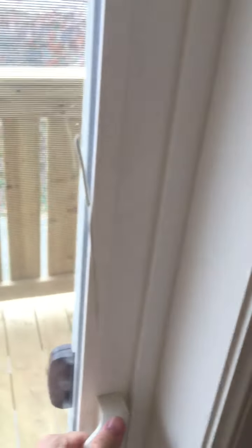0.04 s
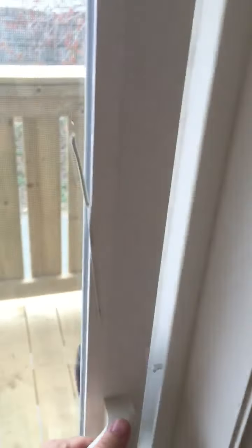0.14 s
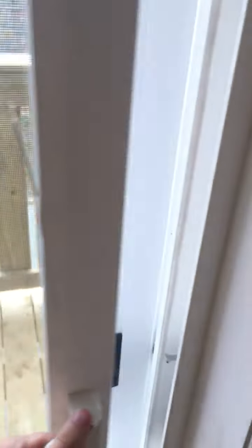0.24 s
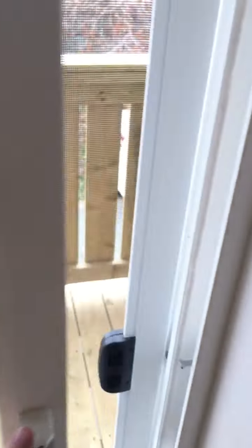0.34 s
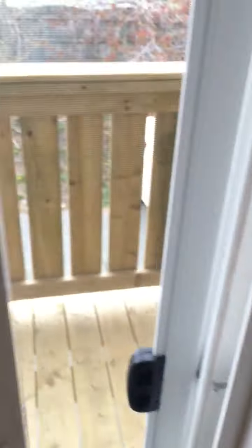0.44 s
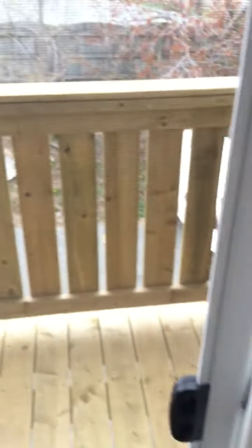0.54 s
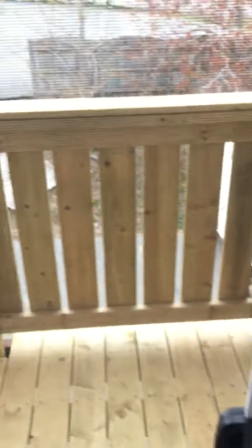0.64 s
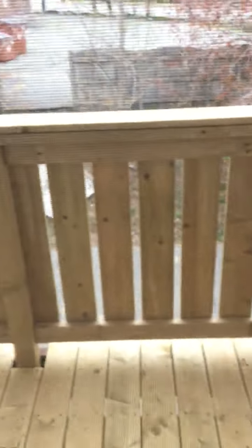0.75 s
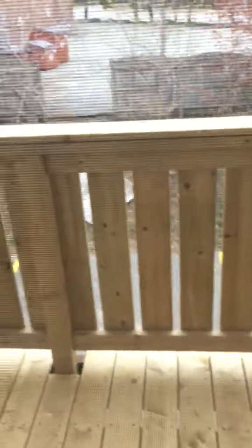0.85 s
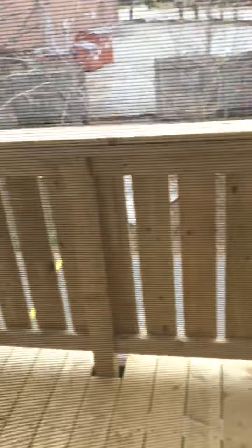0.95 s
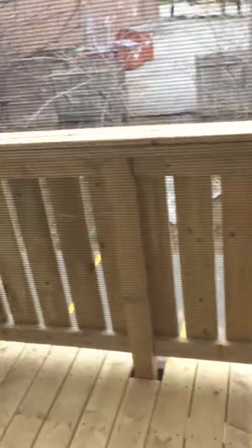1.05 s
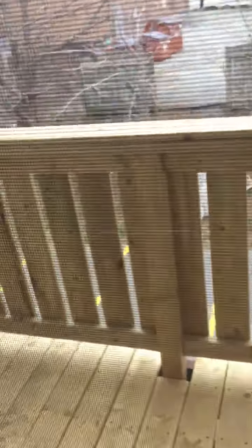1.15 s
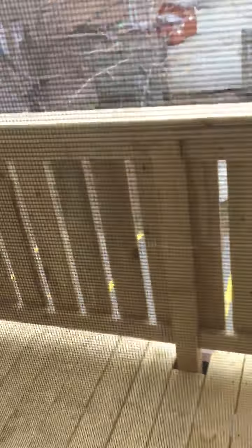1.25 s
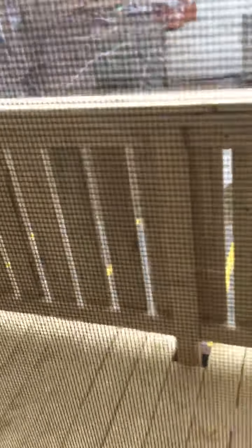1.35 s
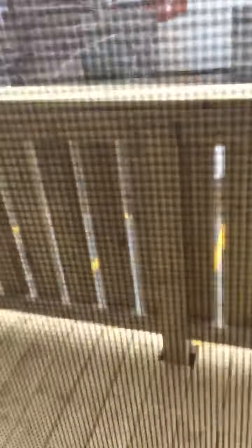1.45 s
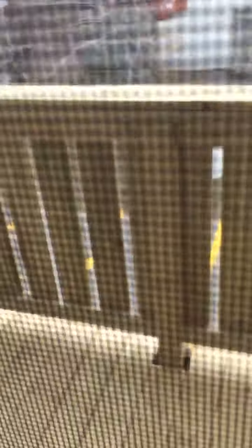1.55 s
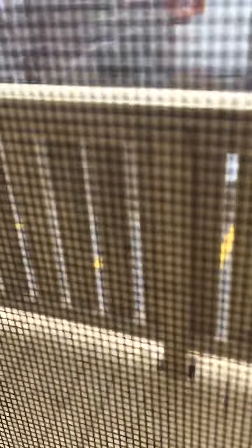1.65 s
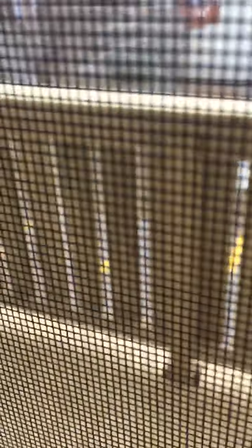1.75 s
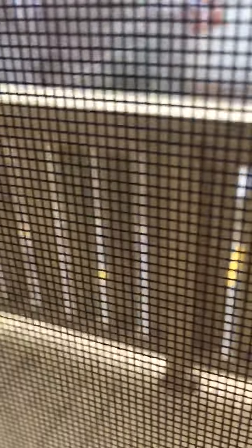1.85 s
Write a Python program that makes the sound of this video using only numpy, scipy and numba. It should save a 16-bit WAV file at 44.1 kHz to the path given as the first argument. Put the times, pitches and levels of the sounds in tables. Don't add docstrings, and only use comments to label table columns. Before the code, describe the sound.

A stuck sliding glass door clacks loose, hisses along its track and thuds against its stop.

```python
import sys
import numpy as np
from scipy import signal
from scipy.fft import rfft, irfft
from scipy.io import wavfile
from scipy.ndimage import uniform_filter1d
from numba import njit

SR = 44100
rng = np.random.default_rng(int(sys.argv[2]) if len(sys.argv) > 2 else 0)


def rack_gain(trim_db):
    fader = np.asarray(trim_db, float)
    return 10 ** (fader / 20)


def transcribe(u):
    v = np.clip(np.atleast_2d(u).T, -1, 1)
    q = np.round(v * 32767).astype(np.int16)
    wavfile.write(sys.argv[1], SR, q)


N = 81585


def column(table, index, t):
    table = np.array(table)
    return np.interp(t, table[:, 0], table[:, index])


def unit(x):
    return x / np.sqrt(np.mean(x ** 2))


@njit
def state_variable(x, hz, width):
    y, band, low = np.empty(len(x)), 0., 0.
    g, damping = np.tan(np.pi * hz / SR), width / hz
    for i in range(len(x)):
        v = (band + g * (x[i] - low)) / (1 + g * (g + damping))
        band, low = 2 * v - band, low + 2 * g * v
        y[i] = damping * v
    return y


def band_pass(x, hz, width):
    return state_variable(x, float(hz), float(width))


def band_noise(hz, width):
    return band_pass(rng.standard_normal(N), hz, width)


def walk(rate):
    hold = int(SR / rate)
    steps = np.repeat(rng.standard_normal(N // hold + 1), hold)
    return 0.56 * uniform_filter1d(uniform_filter1d(steps, hold), hold)[:N]


def coloured(spectrum, flicker_db, grain_db=0):
    hz = np.maximum(np.arange(N // 2 + 1) * SR / N, 1)
    corner_hz, corner_db = np.transpose(spectrum)
    gain = rack_gain(np.interp(np.log(hz), np.log(corner_hz), corner_db, left=-90))
    out = 0
    for octave in range(5, 15):
        band = np.cos(np.pi / 2 * np.clip(np.log2(hz) - octave, -1, 1))
        noise = rng.standard_normal(N) * rack_gain(grain_db * rng.exponential(size=N))
        out = out + irfft(rfft(unit(noise)) * gain * band, N) * rack_gain(flicker_db * walk(14))
    return unit(out)


def ring(push, modes):
    out = 0
    for hz, db, t60 in modes:
        pole = np.exp(2j * np.pi * hz / SR - np.log(1000) / (t60 * SR))
        out = rack_gain(db) * signal.lfilter([1], [1, -pole], push).imag - out
    return out


def knocks(hits, modes, crack, t):
    crack_db, crack_decay_s, crack_hz = crack
    own_t60_s = 0.0076
    out = 0
    for at, db, ms, own_hz, own_db in hits:
        push = np.exp(-2 * ((t - at) / (ms / 1000)) ** 2)
        luck = rng.standard_normal(len(modes))
        struck = [(hz * (1 + 0.054 * r), d + 1.2 * r, t60) for (hz, d, t60), r in zip(modes, luck)]
        body = ring(push / push.sum(), struck + [(own_hz, own_db, own_t60_s)])
        fade = (t > at) * np.exp(-np.abs(t - at) / crack_decay_s)
        noise = band_noise(crack_hz, 1.22 * crack_hz) * fade
        sharpness = np.clip(.09 / ms, 0, 1) ** 2
        out = out + rack_gain(db) * (body + rack_gain(crack_db) * noise * sharpness)
    return out


def swells(table, rough_db, t):
    out = 0
    for at, db, hz, length, rise in table:
        late = t - at
        tone = np.sin(2 * np.pi * (hz + rise * late / 2) * late)
        out = out + rack_gain(db) * tone * np.exp(-(late / length) ** 2)
    return out * rack_gain(rough_db * walk(120))


# [f/Hz, level/dB]
HUM_TONES = [(56, -65), (231, -69.5)]


def hum(t):
    return sum(rack_gain(db + 0.75 * walk(9.5)) * np.sin(2 * np.pi * hz * t) for hz, db in HUM_TONES)


# [f/Hz, density/dB per Hz]
INDOOR_COLOUR = [(25, -19), (60, -8), (170, -1.5), (400, -10.5), (1200, -6.5), (2500, -22), (8000, -29),
                 (16000, -34)]


def room_tone():
    return coloured(INDOOR_COLOUR, 1.0) * rack_gain(-65)


# [f/Hz, density/dB per Hz]
TRAFFIC_COLOUR = [(18, -30), (30, -4), (64, 5), (174, -0.5), (345, -5), (1130, -8.5), (1670, -23.5),
                  (9460, -41), (16000, -72)]
# [t/s, level/dB]
OPENING = [
    (0, -65),
    (.12, -92),
    (.22, -39.5),
    (.6, -45.5),
    (1.0, -49.5),
    (1.3, -40.5),
    (1.6, -41),
    (1.85, -45),
]


def traffic(t):
    return coloured(TRAFFIC_COLOUR, 0.33) * rack_gain(column(OPENING, 1, t))


# [f/Hz, t60/s, level/dB]
ROOM_BANDS = [(130, 0.66, -4.5), (251, 0.75, -7.5), (540, 0.9, -7.5), (880, 2.23, -10), (1200, 1.02, -10.5),
              (2270, 0.25, -5), (4500, 1.2, -9)]
# [f/Hz, level/dB]
FRAME_TONES = [(755, -10), (888, -17), (1040, -12), (1150, -18.5), (1260, -18.5)]


def room(latch_sound, t):
    blow_s, blow_ms, build_s = 1.305, 0.087, 0.0029
    frame_width_hz, frame_t60_s = 26, 1.34
    echo = 0
    for hz, t60, db in ROOM_BANDS:
        echo = echo + rack_gain(db - 60 * t / t60) * unit(band_noise(hz, 0.97 * hz))
    for hz, db in FRAME_TONES:
        echo = echo + rack_gain(db - 60 * t / frame_t60_s) * unit(band_noise(hz, frame_width_hz))
    echo = echo * (1 - np.exp(-t / build_s)) / np.sqrt(SR / 10)
    blow = np.exp(-((t - blow_s) / (blow_ms / 1000)) ** 2)
    return signal.fftconvolve(rack_gain(-3) * blow + rack_gain(-14) * latch_sound, echo)[:N]


# [t/s, level/dB, f/Hz, t60/s]
LURCHES = [(0.234, -34, 64.3, 0.43), (0.233, -21, 400, 0.12), (0.282, -27, 79, 0.13),
           (0.296, -25.5, 245, 0.13), (0.358, -27, 89, 0.048), (0.43, -39, 53, 0.3), (1.318, -26, 60, 0.24),
           (1.316, -27, 158, 0.095), (1.374, -25.5, 247, 0.22), (1.41, -26.5, 91.5, 0.23),
           (1.469, -29, 77.6, 0.17), (1.582, -37, 67, 0.21)]


def thumps(t):
    push_s = .0008
    out = 0
    for at, db, hz, t60 in LURCHES:
        push = np.exp(-((t - at) / push_s) ** 2) / (push_s * SR * np.sqrt(np.pi))
        out = out + rack_gain(db) * ring(push, [(hz, 0, t60)])
    return out


# [f/Hz, width/Hz, level/dB]
ROLLER_MODES = [(203, 96, 2.5), (254, 62, 0), (355.5, 41, 3), (910, 190, -9)]
# [t/s, level/dB]
ROLLER_LOAD = [
    (.17, -105),
    (.23, -38.5),
    (.3, -47.5),
    (.42, -44),
    (.7, -41.5),
    (.9, -37),
    (1.05, -40),
    (1.15, -42),
    (1.3, -53),
]


def rollers(t):
    bumps_per_s, spread_db, stop_db_per_s = 500, 2.5, -27
    bumps = (rng.random(N) < bumps_per_s / SR) * rng.standard_normal(N) * rack_gain(spread_db * walk(25.8))
    frame = 0
    for hz, width, db in ROLLER_MODES:
        frame = frame + rack_gain(db) * band_pass(band_pass(bumps, hz, 1.6 * width), hz, 1.36 * width)
    after_stop = np.maximum(t - ROLLER_LOAD[-1][0], 0)
    return unit(frame) * rack_gain(column(ROLLER_LOAD, 1, t) + stop_db_per_s * after_stop)


# [t/s, level/dB, f/Hz, length/s, rise/Hz per s]
ROUGH_STRETCHES = [(.5, -40.5, 216, .03, 0), (.6, -41, 218, .03, 0), (.72, -47, 150, 0.025, 0),
                   (.79, -39, 372, .03, 0), (.8, -42.5, 593, 0.014, 0), (.84, -35, 192, .018, 0),
                   (.89, -32, 381, 0.017, 298), (.9, -42, 218, 0.025, 302), (.955, -44, 264, 0.017, 0),
                   (1.015, -37, 222, 0.031, 0), (1.02, -38, 327, .025, 0), (1.06, -41.5, 263, 0.021, 500),
                   (1.065, -43, 382, 0.014, 0)]


def grinds(t):
    return swells(ROUGH_STRETCHES, 1.1, t)


# [f/Hz, level/dB, t60/s]
HOOK_MODES = [(4340, -12, 0.033), (5510, -7.5, 0.063), (6550, -10.5, 0.039), (9776, -6, .05),
              (11690, -4.5, 0.1), (12100, -9, .03), (12660, -14, .04), (14800, -11, 0.065)]


def ping(t):
    snap_s, again_s, rattle_s = .2812, .00473, .002
    touches = np.zeros(N)
    touches[int(snap_s * SR)] = .7
    touches[int((snap_s + again_s) * SR)] = 1.07
    tick = band_noise(6200, 11000) * (t > snap_s) * np.exp(-np.abs(t - snap_s) / rattle_s)
    return rack_gain(-27) * (ring(touches, HOOK_MODES) + 2.5 * tick)


# [t/s, level/dB, contact/ms, own f/Hz, own level/dB]
LATCH_HITS = [(.2070, -18, 0.13, 890, -11), (.2160, -25, 0.16, 1000, -21), (.2250, -18.5, 0.26, 1400, 7.5),
              (.2335, -8.5, 0.62, 430, -9.5), (.2353, -21, 0.06, 4500, -3.5),
              (.2523, -8.5, 0.041, 1600, -6), (.2545, -20, .06, 2450, -4), (.2590, -15.5, 0.092, 1300, 5),
              (.2598, -14, 0.075, 3400, 3), (.2625, -23.5, .08, 2600, 0), (.2660, -20.5, 0.13, 2200, 0.5),
              (.2815, -21, 0.023, 11460, 1), (.2960, -17.5, 0.19, 1330, -0.5)]
# [f/Hz, level/dB, t60/s]
LATCH_MODES = [(400, -13, 0.0063), (807, -16.5, 0.053), (1030, -11.5, 0.0077), (1314, -8, 0.028),
               (1760, -5.5, 0.0055), (2270, -9, 0.014), (2900, -5, 0.0025), (4800, -3.5, 0.0022),
               (6540, -7, 0.0048), (11500, -6.5, 0.0072)]
# [level/dB, decay/s, f/Hz]
LATCH_CLICK = (-5, .0011, 4000)


def latch(t):
    return knocks(LATCH_HITS, LATCH_MODES, LATCH_CLICK, t) + ping(t)


def crunch(t):
    at, decay_s = 1.303, 0.014
    grains = rng.standard_normal(N) * rack_gain(4.5 * rng.exponential(size=N))
    fade = (t > at) * np.exp(-np.abs(t - at) / decay_s)
    return rack_gain(-27) * unit(band_pass(grains, 3200, 6000)) * fade


# [t/s, level/dB, contact/ms, own f/Hz, own level/dB]
STOP_HITS = [(1.2978, -11.5, 0.13, 1500, 2.5), (1.3010, -13, 0.14, 3700, -11),
             (1.3027, -13, 0.15, 1500, 4.5), (1.3043, -13.5, 0.054, 1980, 2.5),
             (1.3062, -11.5, 0.099, 1200, 6), (1.3080, -17, 0.14, 2660, 8), (1.3110, -11.5, 0.13, 965, 3),
             (1.3140, -10.5, 0.32, 290, 5.5), (1.3165, -19.5, 0.12, 2900, 0.5),
             (1.3187, -13.5, 0.23, 1000, 3.5), (1.3222, -21, 0.08, 2860, 1.5), (1.3300, -20, 0.34, 790, 0),
             (1.3365, -25, 0.44, 353, -2), (1.3440, -16, 0.29, 1200, 2)]
# [f/Hz, level/dB, t60/s]
PANE_MODES = [(166, -21, 0.038), (262, -25, 0.031), (333.3, -16.5, 0.042), (466, -20, 0.012),
              (653, -18, 0.023), (805, -9.5, 0.026), (858, -13, 0.056), (1140, -2, 0.018),
              (1215, -1.5, 0.027), (1830, 0, 0.0084), (2130, -1.5, 0.012), (2620, -7, 0.016),
              (3400, -2, 0.0047), (5330, 0, 0.0065)]
# [level/dB, decay/s, f/Hz]
STOP_SNAP = (-3, .003, 2400)


def stop(t):
    return knocks(STOP_HITS, PANE_MODES, STOP_SNAP, t) + crunch(t)


# [t/s, level/dB, f/Hz, length/s, rise/Hz per s]
BRISTLE_SQUEAKS = [
    (.77, -56, 4300, 0.025, -2),
    (.815, -60, 5780, .025, 496),
    (.89, -48, 5380, .04, 1500),
    (1.04, -46, 5600, 0.034, 6000),
    (1.072, -46, 6530, .015, 0),
    (1.07, -47, 4250, 0.018, 0),
    (1.34, -55, 9800, .02, 0),
    (1.48, -53, 5700, 0.081, 600),
]


def squeaks(t):
    return swells(BRISTLE_SQUEAKS, 3.0, t)


# [t/s, rubbing level/dB, brightness/dB]
SEAL_MOTION = [(0, -101, 3), (.1, -96, -12), (.16, -57, -4), (.2, -46.5, -2.5), (.24, -48, -11),
               (.32, -41, -2.5), (.42, -40.5, 0.5), (.75, -40, -0.5), (.96, -40.5, -1.5), (1.1, -41.5, 1.5),
               (1.28, -43, 2.5), (1.45, -46.5, -2), (1.6, -46.5, 2), (1.67, -51, -1), (1.74, -62.5, -6),
               (1.79, -54, -2.5), (1.85, -53.5, 0)]
# [f/Hz, density/dB per Hz]
SEAL_COLOUR = [(260, -3), (450, -5.5), (756, -3), (945, -2), (2010, -6), (4760, -12), (5520, -14),
               (12300, -23), (15600, -27)]
# [f/Hz, width/Hz, depth/0-1]
FRAME_NOTCHES = [(490, 260, 0.44), (4850, 930, 0.37), (7780, 950, 0.32), (10430, 1030, 0.54)]
# [f/Hz, width/Hz, share]
BRISTLE_PEAKS = [(5600, 850, 0.43), (9770, 2000, 0.43), (6500, 430, 0.15)]
# [t/s, length/s, f/Hz, width/Hz, share]
BRISTLE_DRAGS = [(0.58, .1, 13000, 5000, .3), (0.763, 0.072, 2000, 900, 0.42), (.8, .12, 13000, 6700, 0.47),
                 (0.94, 0.059, 5350, 400, 0.68), (1.02, 0.036, 11000, 8000, 0.53),
                 (1.27, 0.15, 13000, 5700, -0.4), (0.71, 0.19, 3900, 1400, -0.36),
                 (1.38, 0.074, 7200, 4000, 0.63), (1.62, 0.079, 4200, 900, 0.75),
                 (1.5, 0.093, 14000, 4500, -0.5), (1.81, .05, 9500, 1500, 0.47),
                 (0.66, 0.045, 1100, 330, 0.14)]


def seal(t):
    hiss = coloured(SEAL_COLOUR, flicker_db=.6, grain_db=2.5)
    for hz, width, depth in FRAME_NOTCHES:
        hiss = hiss - depth * band_pass(hiss, hz, width)
    hiss = hiss + sum(share * band_pass(hiss, hz, width) for hz, width, share in BRISTLE_PEAKS)
    drags = 0
    for at, length, hz, width, share in BRISTLE_DRAGS:
        drags = drags + share * np.exp(-((t - at) / length) ** 2) * band_pass(hiss, hz, width)
    hiss = hiss + drags
    low = signal.lfilter([.3], [1, -.7], hiss)
    high = signal.lfilter([.5, -.5], [1], hiss)
    tilt_db = column(SEAL_MOTION, 2, t)
    tilted = rack_gain(-tilt_db) * low + hiss - low + (rack_gain(2 * tilt_db) - 1) * high
    return tilted * rack_gain(5.5 + column(SEAL_MOTION, 1, t))


def scene():
    t = np.arange(N) / SR
    latch_sound = latch(t)
    background = hum(t) + room_tone() + traffic(t) + room(latch_sound, t)
    door = thumps(t) + rollers(t) + grinds(t) + latch_sound + stop(t) + squeaks(t) + seal(t)
    mono = background + door
    return np.array([mono, mono])


# [t/s, f/Hz, width/Hz, level/dB]
SIDE_PATCHES = [(.645, 14100, 2000, -57), (.668, 9300, 2100, -53), (.668, 13800, 1400, -63),
                (.83, 5200, 1000, -48), (.9, 7650, 1400, -53), (.9, 15200, 1400, -64),
                (.946, 10300, 1480, -58), (1.202, 8300, 1400, -55)]


def side_noise(t):
    noise, hz = rfft(rng.standard_normal(N)), np.arange(N // 2 + 1) * SR / N
    out = 0
    for at, centre, width, db in SIDE_PATCHES:
        patch = unit(irfft(noise * (abs(hz - centre) < width / 2), N))
        out = out + rack_gain(db) * patch * np.exp(-((t - at) / 0.012) ** 4)
    return out * np.array([[1], [-1]])


def band_limit(x):
    return signal.sosfilt(signal.butter(12, 15850, fs=SR, output="sos"), x)


def record(dry):
    bass_cut = signal.butter(2, 45, "high", fs=SR, output="sos")
    top_cut = signal.ellip(10, .3, 70, 15780, fs=SR, output="sos")
    x = signal.sosfilt(bass_cut, dry)
    x = signal.sosfilt(top_cut, np.tanh(2.1 * x) / 2.1)
    x = x + side_noise(np.arange(N) / SR)
    return band_limit(x)


dry = scene()
out = record(dry)
transcribe(out)
```